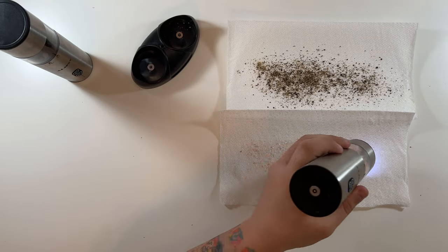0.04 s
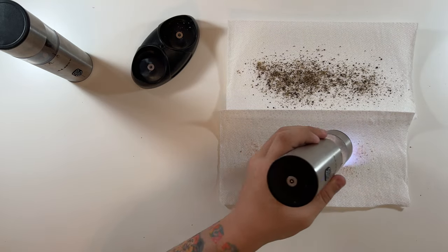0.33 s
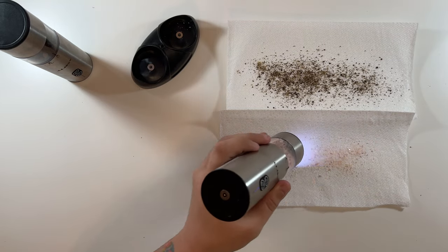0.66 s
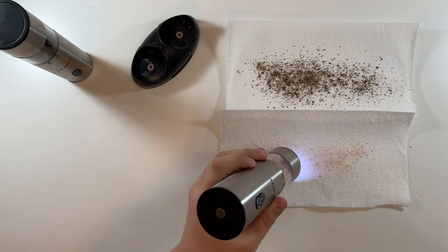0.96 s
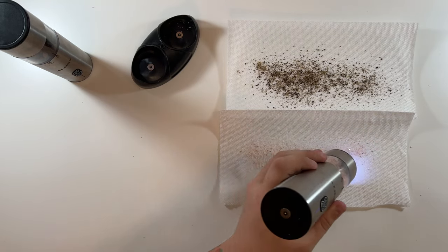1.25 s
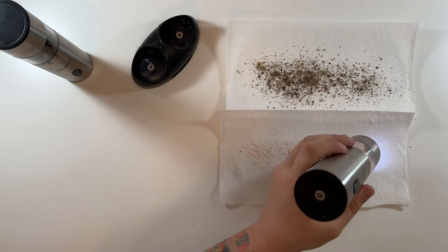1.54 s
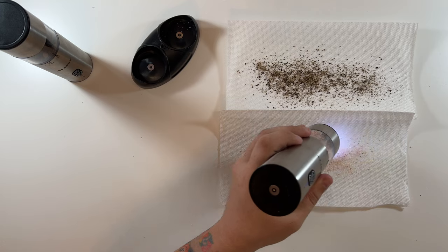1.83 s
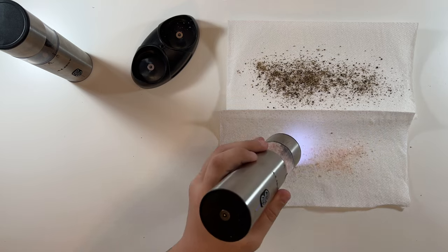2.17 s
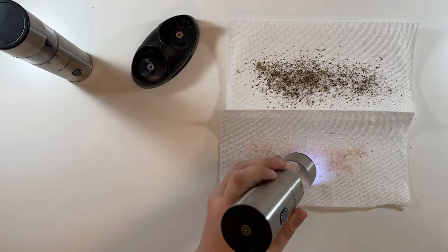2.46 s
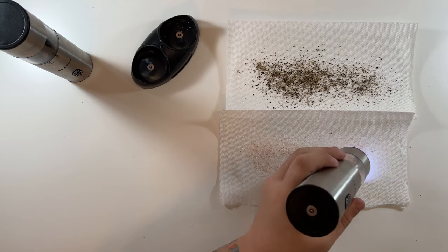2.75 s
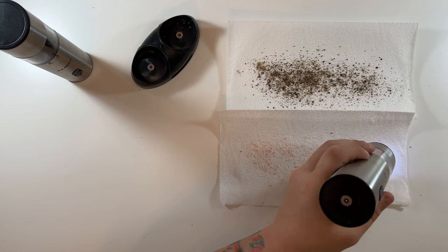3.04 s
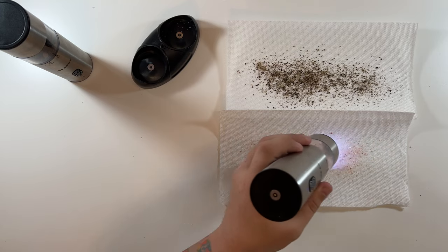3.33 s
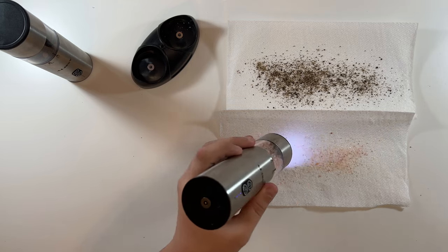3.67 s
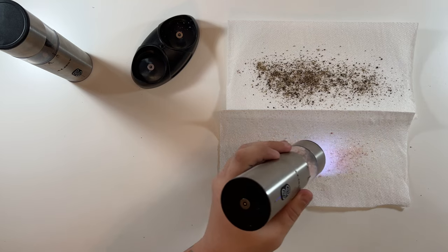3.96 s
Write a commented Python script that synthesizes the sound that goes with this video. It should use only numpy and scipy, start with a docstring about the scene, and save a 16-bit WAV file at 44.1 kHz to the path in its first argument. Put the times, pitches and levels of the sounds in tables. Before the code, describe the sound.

Close up, a battery-powered mill grinds salt without a pause over a table in a small room. Brittle crackles and fine scraping ride on a thin gear whine that wavers in pitch as the grains are crushed.

```python
"""Salt crackles and crunches over a wavering whine: a battery-driven spice mill grinds close by.
Brittle fracture of whole crystals rings the housing, while the burr scrapes and crumbles small grains.
The geared motor sings at a pitch that sags under the load.
The table and a small room reflect the sound, over a faint rumble, mains hum and bumps of the hand."""
import sys
import numpy as np
from scipy import signal
from scipy.fft import rfft, irfft, next_fast_len
from scipy.io import wavfile
from scipy.ndimage import map_coordinates

SR = 44100
rng = np.random.default_rng(int(sys.argv[2]) if len(sys.argv) > 2 else 0)


def int16_out(signal):
    """Quantize to a 16-bit WAV file."""
    q = np.round(np.clip(np.atleast_2d(signal).T, -1, 1) * 32767)
    wavfile.write(sys.argv[1], SR, q.astype(np.int16))


N = 176400

# The housing's response to a blow. Each row: frequency in Hz, relative gain in dB.
HOUSING_RESPONSE = [(100, -54), (300, -37), (540, -19), (700, -10), (900, -4), (1190, 0.5), (1330, -4),
                    (1700, 5.5), (2080, -7), (2450, 2), (2950, -4), (3350, -8.5), (3750, -6), (4400, -10.5),
                    (6000, -19), (8500, -18.5), (12400, -8.5), (16000, -19.5)]
# Cracking crystals. Each row: time in seconds, then knock, snap and hiss levels in dB before band gain.
CRYSTAL_CRACKS = [(0.0156, -37, -40, -44), (0.0887, -39.5, -45, -42.5), (0.1239, -35, -38, -45),
                  (0.161, -37.5, -35.5, -47), (0.2163, -39, -43.5, -40), (0.2302, -37, -52, -48),
                  (0.292, -39, -48, -55), (0.3122, -41, -42.5, -52), (0.406, -41, -48, -60),
                  (0.4517, -41.5, -45, -46), (0.492, -36.5, -39, -39), (0.5701, -40.5, -37.5, -50),
                  (0.592, -42.5, -39.5, -50), (0.6385, -49, -56, -44), (0.733, -37, -41, -41),
                  (0.776, -39.5, -44.5, -44), (0.7985, -41, -41.5, -47), (0.9197, -42, -39, -50),
                  (1.0058, -42.5, -45, -65), (1.0772, -37, -36, -42.5), (1.0952, -45, -39, -47),
                  (1.148, -32, -32, -36), (1.1895, -36, -40, -46), (1.2232, -35.5, -37.5, -41.5),
                  (1.2594, -42, -40, -47), (1.3268, -45, -42.5, -56), (1.4767, -42.5, -39.5, -45.5),
                  (1.511, -57, -41.5, -39), (1.5371, -46, -39.5, -44), (1.6403, -39, -29.5, -42.5),
                  (1.6764, -41, -44, -43.5), (1.7342, -41, -36, -50), (1.7893, -38, -38, -38),
                  (1.878, -34.5, -33.5, -38), (1.8932, -37.5, -36.5, -40.5), (1.9892, -39.5, -36.5, -39),
                  (2.001, -44, -46, -47), (2.1056, -38.5, -36, -38.5), (2.204, -43.5, -46, -46),
                  (2.2389, -49, -46, -48), (2.3241, -44.5, -50, -44.5), (2.3504, -41, -34.5, -39.5),
                  (2.388, -39, -57, -45.5), (2.4319, -37.5, -48, -40.5), (2.4805, -35.5, -33.5, -42),
                  (2.5502, -44, -38.5, -52), (2.5688, -44, -47, -44.5), (2.5833, -46, -44, -44),
                  (2.7613, -44, -51, -43.5), (2.7868, -39.5, -40, -47), (2.7955, -36.5, -43, -41),
                  (2.8075, -53, -42, -49), (2.868, -41, -44, -52), (2.8829, -39, -42, -44),
                  (2.9264, -42.5, -53, -49), (2.998, -54, -51, -57), (3.027, -37.5, -36.5, -45),
                  (3.055, -46, -46, -50), (3.0906, -40, -42.5, -41), (3.1797, -37.5, -46, -41),
                  (3.1886, -43, -48, -42.5), (3.2201, -40.5, -45, -42), (3.2553, -38.5, -41.5, -41.5),
                  (3.2833, -39, -41.5, -46), (3.3129, -42, -45, -49), (3.354, -42, -45, -42.5),
                  (3.3791, -41.5, -34, -43), (3.4884, -43, -42, -48), (3.4966, -37.5, -42, -47),
                  (3.5253, -38.5, -37, -41.5), (3.613, -42, -42, -47.5), (3.6501, -48, -39.5, -56),
                  (3.6921, -47, -42.5, -44), (3.7714, -46, -31.5, -35), (3.8822, -42.5, -38, -52),
                  (3.9247, -32.5, -32.5, -38), (3.9953, -41, -38.5, -45)]
# Knock, snap and hiss bands. Each row: band gain in dB, crumbling tail relative to the burst in dB.
CRACK_BANDS = [(-0.6, -21.5), (0, -19), (2.4, -6)]

def crystal_cracks(knock_edge_hz=1802, hiss_edge_hz=3550, ring_spread_db=2):
    """Brittle fracture: each crystal bursts, then crumbles, exciting the housing's resonances."""
    lead_s, rise_s, fall_s, crumble_s = 0.003, 0.00079, 0.0018, 0.013
    t = np.arange(SR // 20) / SR - lead_s
    rise, after = np.exp(np.minimum(t, 0) / rise_s), np.maximum(t, 0)
    fall, crumble = np.exp(-(after / fall_s) ** 2 / 2), np.exp(-after / crumble_s)
    knock = lambda hz: lowpass(hz, knock_edge_hz)
    snap = lambda hz: lowpass(hz, hiss_edge_hz) * (1 - knock(hz))
    hiss = lambda hz: 1 - lowpass(hz, hiss_edge_hz)
    out = np.zeros(N + SR)
    for time_s, *levels in CRYSTAL_CRACKS:
        start = max(round((time_s - lead_s) * SR), 0)
        # Every crystal excites the resonances differently.
        colour = [(hz, db + ring_spread_db * rng.standard_normal()) for hz, db in HOUSING_RESPONSE]
        for band, db, (gain_db, crumble_db) in zip((knock, snap, hiss), levels, CRACK_BANDS):
            envelope = rise * (fall + amp(crumble_db) * crumble)
            ring = ringing(lambda hz: band(hz) * gain_at(colour, hz))
            burst = signal.fftconvolve(envelope * rng.standard_normal(len(t)), ring)
            burst *= np.sqrt(0.008 * SR / np.sum(burst ** 2))  # the energy of 8 ms at rms 1
            out[start:][:len(burst)] += amp(db + gain_db) * burst
    return out[:N]

# The burr scraping on powder. Each row: frequency in Hz, relative spectral density in dB.
SCRAPE_SPECTRUM = [(100, -46), (300, -25), (560, -17.5), (690, -6), (820, -11.5), (1200, -4), (1350, -4.5),
                   (1700, -4), (1860, -2), (2080, -11), (2480, -10.5), (3300, -11), (3650, -11),
                   (4450, -14), (4800, -13), (8500, -16), (11000, -31), (12700, -9.5), (16000, -19)]
# Fine splinters ticking. Each row: frequency in Hz, relative spectral density in dB.
SPLINTER_SPECTRUM = [(1000, -31), (4000, -10.5), (8000, -14.5), (12500, 3.5), (16000, -6.5)]

def burr():
    """Friction and fragmentation: scraping, crunching and ticking swell as the salt feeds unevenly."""
    scrape = noise(SCRAPE_SPECTRUM) * amp(-46 + 2 * wobble(120))
    crunch = amp(-49) * grains(per_second=170, spread_db=4.5, life_s=0.002, colour=HOUSING_RESPONSE)
    ticks = amp(-53.5) * grains(per_second=230, spread_db=7, life_s=0.0037, colour=SPLINTER_SPECTRUM)
    feed = amp(1.33 * wobble(22))
    return (scrape + crunch + ticks) * feed

def grains(per_second, spread_db, life_s, colour, count=4000):
    """A Poisson process: small fractures of uneven size add in power and decay; the sum has rms 1."""
    gaps, strengths = -np.log(1 - rng.random((count, 2))).T
    starts = (np.cumsum(gaps) * SR / per_second).astype(int)
    sizes = amp(spread_db * np.minimum(strengths, 3))
    power = np.bincount(starts[starts < N], sizes[starts < N] ** 2, N)
    envelope = np.sqrt(signal.lfilter([1], [1, -np.exp(-2 / (life_s * SR))], power))
    bursts = envelope * rng.standard_normal(N)
    return unit(signal.fftconvolve(bursts, ringing(lambda hz: gain_at(colour, hz)))[:N])

# The gear whine, sagging when the burr bites. Each row: time in seconds, frequency in Hz.
WHINE_PITCH = [(0, 1812), (.28, 1878), (.34, 1813), (.39, 1700), (.49, 1855), (.57, 1869), (.66, 1759),
               (.73, 1750), (1.0, 1853), (1.12, 1850), (1.21, 1640), (1.28, 1794), (1.35, 1672),
               (1.45, 1650), (1.58, 1790), (1.73, 1839), (1.85, 1816), (1.92, 1718), (2.04, 1766),
               (2.11, 1686), (2.27, 1845), (2.44, 1826), (2.51, 1726), (2.7, 1759), (2.85, 1818),
               (2.95, 1816), (3.02, 1735), (3.2, 1680), (3.28, 1716), (3.33, 1827), (3.45, 1899),
               (3.56, 1850), (3.63, 1709), (3.73, 1843), (3.82, 1753), (4, 1835)]
# The whine's fundamental. Each row: time in seconds, level in dB.
WHINE_LEVEL = [(0, -46.5), (.1, -45.5), (.55, -47), (.72, -46.5), (.87, -59), (1.15, -48.5), (1.3, -46.5),
               (1.75, -46), (1.95, -55), (2.2, -57), (2.32, -48), (2.88, -46), (3.05, -49.5), (3.17, -45),
               (3.5, -52), (3.85, -47.5), (4, -50)]
# A faster gear's high whine. Each row: time in seconds, level in dB.
FAST_GEAR_LEVEL = [(0, -61.5), (.9, -62), (1.65, -60), (2.27, -64), (2.55, -57), (3.3, -63), (3.55, -62)]

def geared_motor(jitter_hz=21.2, flutter_db=2.5):
    """Gear meshing: tones follow the motor's speed, modulated in pitch and level by the grinding."""
    phase = 2 * np.pi * np.cumsum(curve(WHINE_PITCH)) / SR
    def tone(ratio):
        flutter = amp(flutter_db * wobble(150))
        shake = 2 * np.pi * np.cumsum(jitter_hz * wobble(280)) / SR
        return unit(flutter * np.sin(ratio * phase + shake))
    whine = amp(curve(WHINE_LEVEL)) * tone(1) + amp(-61) * tone(2)
    return whine + amp(curve(FAST_GEAR_LEVEL)) * tone(2.5)

# The low mids as the mill is carried about. Each row: time in seconds, gain in dB.
LOW_MID_GAIN = [(0, 1), (1.1, 0.5), (1.8, 2.5), (2.05, 0.5), (2.33, -10), (2.5, 1), (3.25, -2), (3.6, -8),
                (4, 0)]

def carried_about(mill, edge_hz=720):
    """Shelf filtering: the sound below the edge swells and dips as the mill moves."""
    low = filtered(mill, lambda hz: lowpass(hz, edge_hz, order=10))
    return mill + low * (amp(curve(LOW_MID_GAIN)) - 1)

# Stereo width of the reflections. Each row: frequency in Hz, gain of the side signal in dB.
SIDE_GAIN = [(270, -5), (740, -7), (1220, -4.5), (2010, -11), (3330, -5), (5500, -2.5), (8500, -1),
             (11500, 8), (12700, -17.5), (15500, -3)]

def table_and_room(mill, room_t60_s=0.16):
    """Decorrelation: reflections from the table and the room spread the mill between the ears."""
    mid = mill + amp(-10) * reflections(mill, room_t60_s, delay_s=0.0044)
    table = amp(-1) * reflections(mill, t60_s=0.025, delay_s=0.0004)
    room = amp(-2) * reflections(mill, room_t60_s, delay_s=0.002)
    side = filtered(table + room, lambda hz: gain_at(SIDE_GAIN, hz))
    return np.array([mid + side, mid - side])

def reflections(x, t60_s, delay_s, count=4, drifts_per_second=2.977):
    """Diffuse reverberation: decaying tails of unit energy, whose blend drifts as the mill moves."""
    t = np.arange(SR // 4) / SR
    tails = rng.standard_normal((count, len(t))) * amp(-60 * t / t60_s) * (t > delay_s)
    tails /= np.linalg.norm(tails, axis=1, keepdims=True)
    paths = signal.fftconvolve(x[None], tails, axes=1)[:, :N]
    shares = np.array([wobble(drifts_per_second) for _ in paths])
    return np.sum(paths * shares, axis=0) / np.linalg.norm(shares, axis=0)

# The hand bumping the mill. Each row: peak time in seconds, half-width in seconds, level in dB.
HAND_BUMPS = [(0.165, 0.071, -63), (0.767, 0.02, -66), (1.696, 0.08, -65.5), (1.892, 0.033, -66.5)]
# A bump's dull tone. Each row: frequency in Hz, relative spectral density in dB.
BUMP_SPECTRUM = [(25, -22), (48, -4), (80, -7), (200, -19), (330, -11), (600, -42)]

def hand_bumps():
    """Soft impact: the hand gives the mill smooth pulses of low-frequency noise."""
    t = np.arange(N) / SR
    pulses = sum(amp(db) * np.exp(-((t - peak_s) / width_s) ** 2) for peak_s, width_s, db in HAND_BUMPS)
    return noise(BUMP_SPECTRUM) * pulses

# The room's rumble. Each row: frequency in Hz, relative spectral density in dB.
RUMBLE = [(20, -20), (32, -22), (45, -0.5), (65, -5), (90, -6), (160, -8), (250, -13), (550, -25)]

def room_tone(hum_hz=121.4):
    """Partial coherence: low rumble reaches both ears nearly alike, along with a faint mains hum."""
    rumble = noise(RUMBLE) + amp(-9) * np.array([noise(RUMBLE), noise(RUMBLE)])
    hum = unit(np.sin(2 * np.pi * hum_hz * np.arange(N) / SR))
    return amp(-71.5) * rumble + amp(-83.5) * hum

def amp(db):
    """Decibels as an amplitude ratio."""
    return 10 ** (np.asarray(db) / 20)

def unit(x):
    """Normalisation to rms 1."""
    return x / np.sqrt(np.mean(x ** 2) + 1e-20)

def gain_at(points, hz):
    """Amplitude gain from (Hz, dB) points, interpolated on a log frequency axis."""
    knots_hz, db = np.transpose(points)
    return amp(np.interp(np.log(hz + 1), np.log(knots_hz + 1), db))

def lowpass(hz, edge_hz, order=12):
    """Low-pass gain, one half at the edge."""
    return 1 / (1 + (hz / edge_hz) ** order)

def curve(rows):
    """Linear interpolation of (seconds, value) points at every sample."""
    return np.interp(np.arange(N) / SR, *np.transpose(rows))

def wobble(per_second):
    """Smooth random modulation: a spline through this many knots a second."""
    return map_coordinates(rng.standard_normal(N // 8), [np.arange(N) * per_second / SR], mode="wrap")

def filtered(x, response):
    """Zero-phase filtering by a gain over frequency."""
    size = next_fast_len(N + SR // 2)
    return irfft(rfft(x, size) * response(np.fft.rfftfreq(size, 1 / SR)), size)[..., :N]

def ringing(gain, size=1024):
    """Minimum-phase impulse response with this gain over frequency."""
    cepstrum = irfft(np.log(np.maximum(gain(np.fft.rfftfreq(size, 1 / SR)), 1e-6)))
    cepstrum[1:size // 2] *= 2
    cepstrum[size // 2 + 1:] = 0
    return irfft(np.exp(rfft(cepstrum)))

def noise(colour):
    """Gaussian noise of rms 1 with this spectrum."""
    return unit(filtered(rng.standard_normal(N), lambda hz: gain_at(colour, hz)))

def scene():
    """Superposition: the mill, almost central, adds to its reflections and the quiet background."""
    mill = carried_about(geared_motor() + burr() + crystal_cracks())
    balance = amp([[-0.3], [0.3]])
    return table_and_room(mill) * balance + room_tone() + hand_bumps()

# The microphone's treble notch. Each row: frequency in Hz, gain in dB.
MIC_RESPONSE = [(8800, 0), (9150, -7), (9600, -22.5), (10600, -25), (11150, -8), (11900, -1)]

def record(dry, top_hz=15950):
    """Frequency response: the microphone notches the treble and limits the bandwidth."""
    return filtered(dry, lambda hz: gain_at(MIC_RESPONSE, hz) * (hz < top_hz))

dry = scene()
out = record(dry)
int16_out(out)
```